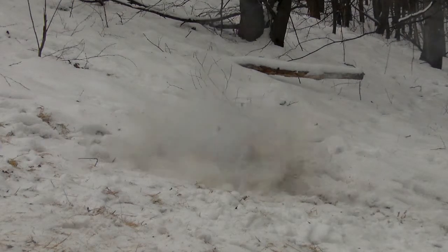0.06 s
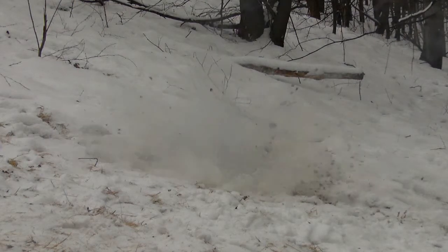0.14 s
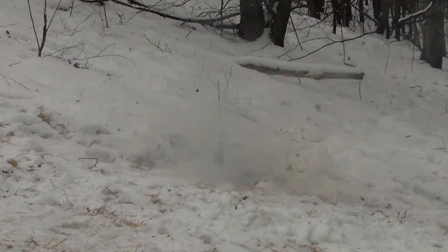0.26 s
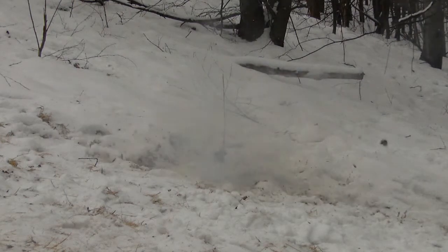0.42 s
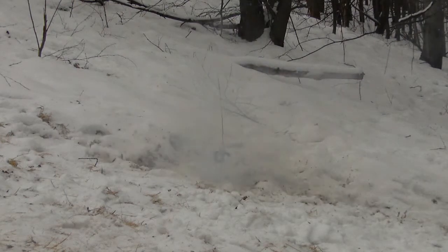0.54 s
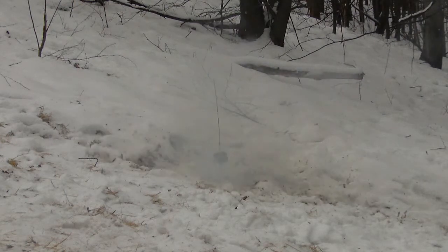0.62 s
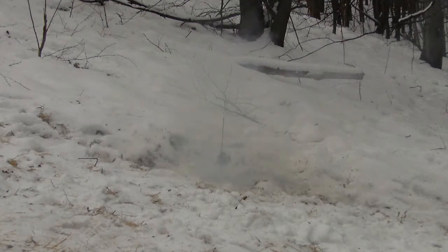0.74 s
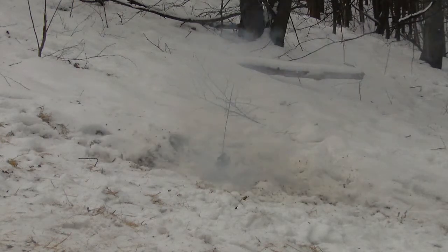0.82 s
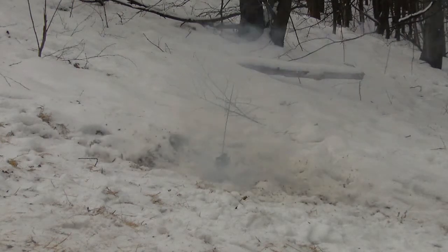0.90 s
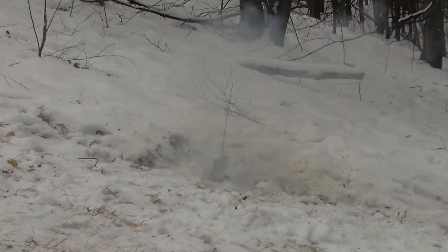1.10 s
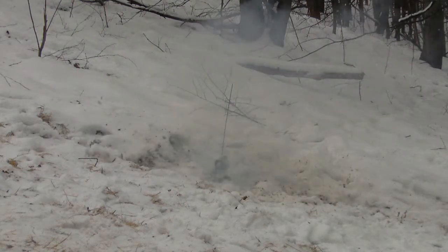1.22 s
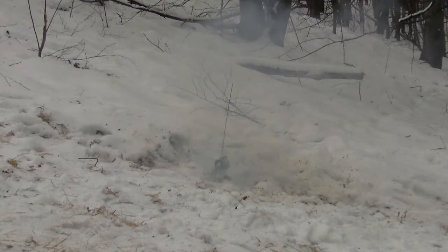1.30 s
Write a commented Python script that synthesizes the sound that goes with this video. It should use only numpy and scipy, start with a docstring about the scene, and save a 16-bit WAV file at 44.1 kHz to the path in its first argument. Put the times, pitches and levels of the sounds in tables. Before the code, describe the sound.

After a moment of quiet outdoor air, one sharp explosion goes off close by at about 0.2 seconds, overloading the microphone. Rapid echoes slap off the trees until around 0.7 seconds and blend into a darkening roll. Near 1 second a far hillside returns a dull rumble, while thrown snow hisses down very faintly until about 1.4 seconds. The rumble then fades into soft background hiss.

```python
"""A snowy slope at the edge of a wood: a homemade charge goes off a few metres away.
The shock wave overloads both microphones; trunks throw back sharp slaps and a dense, darkening roll.
A far hillside answers with a dull rumble while thrown snow hisses down and the limiter slowly lets go."""
import sys
import numpy as np
from scipy import signal
from scipy.fft import rfft, irfft
from scipy.io import wavfile
from scipy.ndimage import uniform_filter1d

SR = 44100
rng = np.random.default_rng(int(sys.argv[2]) if len(sys.argv) > 2 else 0)


def unload_audio(sound):
    """Save the sound as a 16-bit wav file, at the path given as the first command line argument."""
    columns = np.transpose(np.atleast_2d(sound))
    # keep every value between -1 and 1, then stretch to whole-number steps
    steps = np.round(np.clip(columns, -1, 1) * 32767)
    wavfile.write(sys.argv[1], SR, steps.astype(np.int16))


N = 59535

# stereo width of all noise layers: f/Hz, side minus mid/dB
STEREO_WIDTH = [(60, -9.5), (200, -16.5), (500, -16.5), (1200, -12.5), (2300, -8.5), (4200, -4), (8000, 2)]
# bed of still air and microphone hiss: f/Hz, level/dB
AIR_BANDS = [(30, -50), (60, -55), (125, -57.5), (200, -63.5), (450, -59.5), (1000, -60), (2000, -63),
             (4000, -65.5), (8000, -66), (13000, -59)]
# the casing tearing open: f/Hz, level/dB
CASING_BANDS = [(1000, -3), (2500, -3), (5000, -6), (11000, -10)]
# scatter off nearby ground and trees: f/Hz, level/dB, T60/s, build-up/s
SCATTER_BANDS = [(60.3, -20.5, .6, 0.012), (125, -21, 0.33, 0.017), (243, -8.5, 0.57, .04),
                 (473, -1, 0.61, 0.069), (1030, -3, 0.71, 0.036), (2000, -2.5, 0.63, .003),
                 (4200, -1, 0.46, 0.0014), (7860, -2.5, 0.41, 0.0012), (13000, 0, 0.34, 0.0017)]
# long roll from deeper in the wood: f/Hz, level/dB
WOOD_BANDS = [(60, -39.5), (125, -32.5), (250, -28.5), (500, -17.5), (1000, -19.5), (2000, -24),
              (4000, -37), (8000, -47), (13000, -72.5)]
# slaps off single trunks and banks: t/s, level/dB, f/Hz, crack relative to slap/dB
TRUNK_SLAPS = [(0.2523, 8.5, 920, 3), (0.2545, -2.5, 890, -15), (0.2750, 7.5, 890, 0.5),
               (0.2778, 2.5, 1000, -11), (0.2892, 7, 750, -31), (0.3197, 3, 600, -5),
               (0.3300, 0.5, 540, -10), (0.3440, 8.5, 507, -21), (0.3480, 2, 560, -23),
               (0.3540, -1.5, 540, -6.5), (0.3718, 4.5, 650, -19), (0.3740, 0, 680, -17),
               (0.3880, 3.5, 602, -29.5), (0.4175, 0.5, 510, -13), (0.4640, -5, 600, -13),
               (0.6735, -15, 550, -21.5), (0.6935, -14, 476, -30)]
# low thuds off the slope: t/s, level/dB, f/Hz
SLOPE_THUDS = [(0.279, -3.5, 151), (0.332, -4, 110.7), (0.379, -8.5, 97.3), (0.461, -19, 100),
               (0.494, -20.5, 94)]
# echo off the far hillside: f/Hz, level/dB
HILL_BANDS = [(30, -30), (60, -42), (125, -35), (250, -28.5), (500, -18), (1000, -23.5), (2000, -30.5),
              (4000, -53), (8000, -71), (13000, -73)]
# arrivals from its near and far ridge: t/s, level/dB
RIDGE_ECHOES = [(0.974, 0.5), (1.11, -4)]
# showers of thrown snow: t/s, half length/s, level/dB
SNOW_SHOWERS = [(1.039, 0.028, -55), (1.166, 0.057, -50.5), (1.224, 0.028, -44), (1.31, 0.052, -54.5)]
# hiss of the landing snow: f/Hz, level/dB
SNOW_BANDS = [(1000, 7), (2000, -8), (4000, -3.5), (8000, -3.5), (13000, 0)]
# slow swing of each overloaded microphone, left then right: kick/ceiling, decay/s, rebound/ceiling, decay/s
MIC_SWINGS = [(-1.9, 0.031, 0.94, 0.077), (0.58, 0.056, -0.25, .09)]

BLAST_S, PUSH_S, SUCTION_S = 0.2383, 0.002, 0.0032  # moment of the shock, lengths of its two phases


def undb(db):
    """Decibels to gain."""
    return 10 ** (np.asarray(db) / 20)


def since(start):
    """Seconds since a moment, zero before it."""
    return np.maximum(np.arange(N) / SR - start, 0)


def wander(rate_hz):
    """Smooth random modulation with a spread of 1."""
    size = max(int(SR / rate_hz), 2)
    drift = uniform_filter1d(rng.standard_normal(N), size, mode="wrap")
    drift = uniform_filter1d(drift, size, mode="wrap")
    return drift / drift.std()


def bands(table, grain_db=0):
    """Grainy stereo noise, wider in the treble, split into unit-level bands at the table's frequencies."""
    log_f = np.log(np.maximum(np.arange(N // 2 + 1) * SR / N, 1))
    grains = np.repeat(rng.exponential(size=N // 8 + 1), 8)[:N]
    grain_gain = undb(grain_db * np.minimum(grains, 5))
    mid, side = rfft(rng.standard_normal((2, N)) * grain_gain)
    width_hz, width_db = np.array(STEREO_WIDTH).T
    side = side * undb(np.interp(log_f, np.log(width_hz), width_db))
    stereo = np.array([mid + side, mid - side])
    centres = np.log([row[0] for row in table])
    edges = np.concatenate([[centres[0] - 1], centres])
    split = [irfft(stereo * np.interp(log_f, edges, share), N) for share in np.eye(len(edges))[1:]]
    return [band / band.std() for band in split]


def wash(table, grain_db=0, flutter_db=0):
    """Noise coloured by the table's band levels, with optional flutter in each band."""
    return sum(band * undb(db + flutter_db * wander(45))
               for band, (_, db) in zip(bands(table, grain_db), table))


def tail(age, t60_s, build_s):
    """Reverb envelope: builds up while it dies away."""
    return undb(-60 * age / t60_s) * (1 - np.exp(-age / build_s))


def pulse(centre_s, hz, half_length_s):
    """A pressure pulse rounded by reflection: a tone under a bell-shaped envelope."""
    offset = np.arange(N) / SR - centre_s
    return -np.cos(2 * np.pi * hz * offset) * np.exp(-.5 * (offset / half_length_s) ** 2)


def shock():
    """A sudden overpressure, torn by the bursting casing, falls through zero into a short suction."""
    age = since(BLAST_S)
    fade_out = np.clip((PUSH_S + SUCTION_S - age) / 0.00077, 0, 1)
    pressure = undb(43.5) * (1 - age / PUSH_S) * np.exp(-age / PUSH_S) * fade_out
    casing = undb(44) * wash(CASING_BANDS) * np.exp(-age / 0.001)
    return (age > 0) * (pressure + casing)


def near_scatter():
    """Countless small echoes from close by: the top hits at once and dies early, the mids bloom."""
    age = since(BLAST_S)
    echoes = sum(band * undb(db) * tail(age, t60_s, build_s)
                 for band, (_, db, t60_s, build_s) in zip(bands(SCATTER_BANDS, grain_db=2), SCATTER_BANDS))
    flutter = undb(1.3 * wander(170))
    return echoes * flutter


def wood_roll():
    """The dull roll that comes back from deeper among the trees."""
    envelope = tail(since(BLAST_S), t60_s=2.21, build_s=0.23)
    return wash(WOOD_BANDS, grain_db=2.5, flutter_db=-0.5) * envelope


def trunk_slaps(half_length_s=0.000853, crack_decay_s=0.0023):
    """Single trunks and banks each throw back a slap with a bright crack on top."""
    bright_noise = wash([(1500, 1), (3000, -2), (7000, -10), (13000, -19)])  # f/Hz, level/dB
    slaps = np.zeros((2, N))
    for centre_s, db, hz, crack_db in TRUNK_SLAPS:
        age = since(centre_s - half_length_s)
        crack = undb(crack_db) * bright_noise * (age > 0) * np.exp(-age / crack_decay_s)
        slaps += undb(db) * (pulse(centre_s, hz, half_length_s) + crack)
    return slaps


def slope_thuds():
    """The slope returns the low end as a few round thuds."""
    return sum(undb(db) * pulse(centre_s, hz, half_length_s=0.0075) for centre_s, db, hz in SLOPE_THUDS)


def hollow_ring():
    """A brief hollow note rings among the trunks."""
    return undb(-6) * pulse(centre_s=0.338, hz=549, half_length_s=0.016)


def hillside():
    """Each far ridge's echo swells as more of it is reached, then fades."""
    power = sum((undb(db) * tail(since(start), t60_s=1.97, build_s=0.062)) ** 2
                for start, db in RIDGE_ECHOES)
    return wash(HILL_BANDS, grain_db=2, flutter_db=2) * np.sqrt(power)


def thrown_snow():
    """Thrown snow comes down in soft, grainy showers."""
    t = np.arange(N) / SR
    flow = sum(undb(db) * np.exp(-.5 * ((t - centre_s) / half_length_s) ** 2)
               for centre_s, half_length_s, db in SNOW_SHOWERS)
    return wash(SNOW_BANDS, grain_db=1.5) * flow


def scene():
    """The blast, its echoes and the falling snow over a bed of quiet air."""
    air = wash(AIR_BANDS, flutter_db=.8)
    return (air + shock() + near_scatter() + wood_roll() + trunk_slaps() + slope_thuds() + hollow_ring()
            + hillside() + thrown_snow())


def record(dry, release_db_per_s=6, top_hz=14200):
    """The microphones swing and clip; a limiter ducks at once and recovers slowly; the top is cut."""
    age = since(BLAST_S + PUSH_S + SUCTION_S)
    swing = np.array([(age > 0) * (kick * np.exp(-age / kick_s) + rebound * np.exp(-age / rebound_s))
                      for kick, kick_s, rebound, rebound_s in MIC_SWINGS])
    ceiling = undb(16)  # microphone headroom above the limiter's threshold
    clipped = ceiling * np.tanh(dry / ceiling + swing)
    over_db = 20 * np.log10(np.maximum(np.abs(clipped).max(axis=0), 1))
    release_db = release_db_per_s * np.arange(N) / SR
    duck_db = np.maximum.accumulate(over_db + release_db) - release_db
    high_cut = signal.ellip(8, .2, 70, top_hz, fs=SR, output="sos")
    return np.clip(signal.sosfilt(high_cut, clipped * undb(-duck_db)), -1, 1)


dry = scene()
out = record(dry)
unload_audio(out)
```